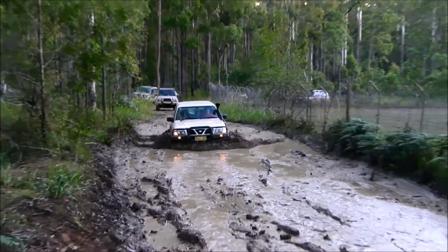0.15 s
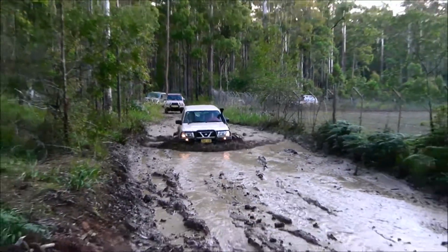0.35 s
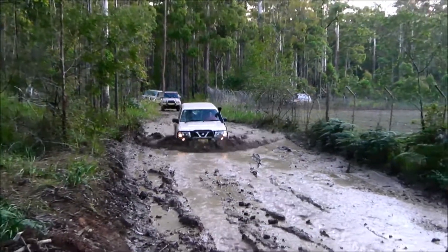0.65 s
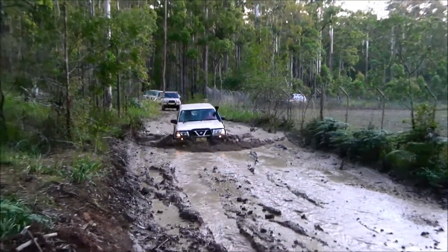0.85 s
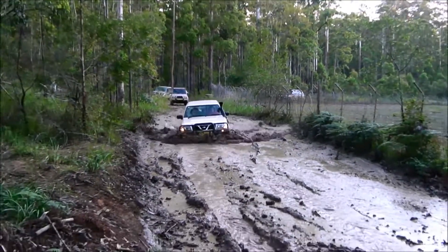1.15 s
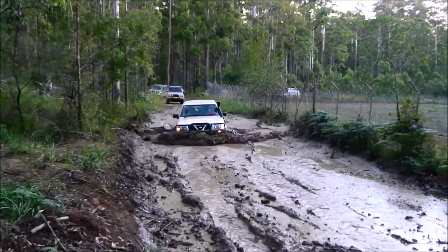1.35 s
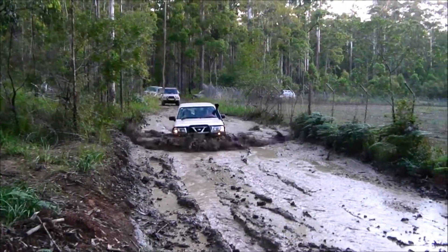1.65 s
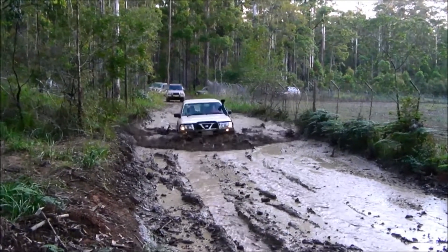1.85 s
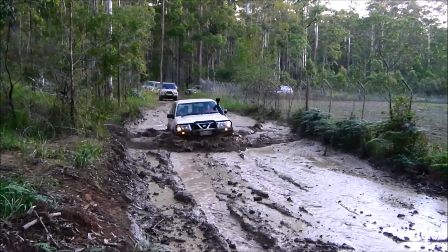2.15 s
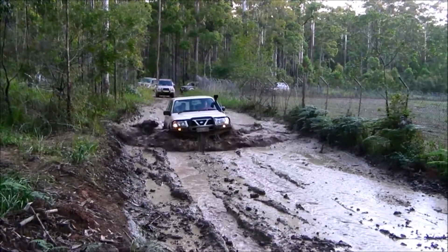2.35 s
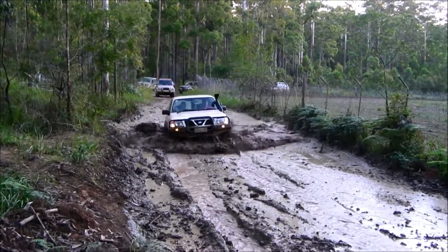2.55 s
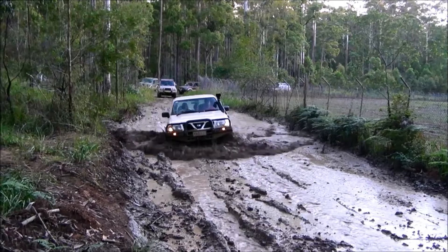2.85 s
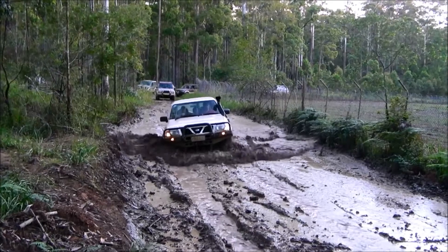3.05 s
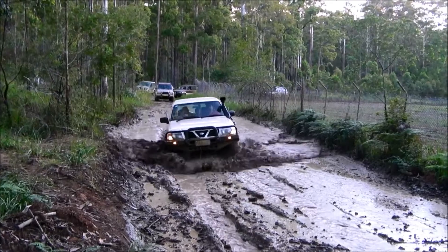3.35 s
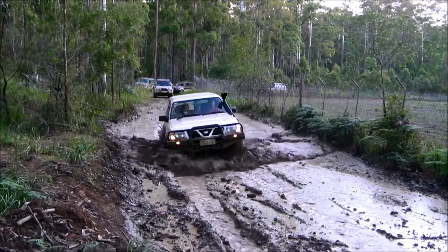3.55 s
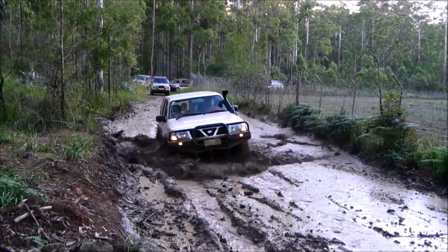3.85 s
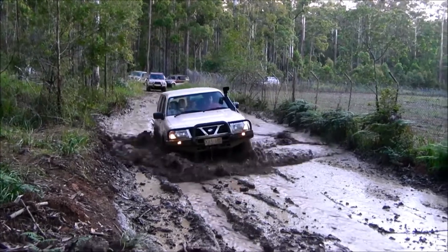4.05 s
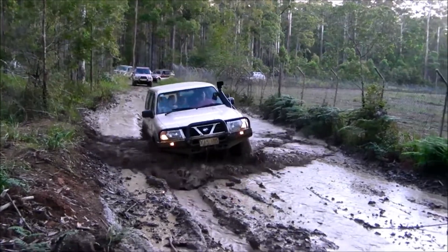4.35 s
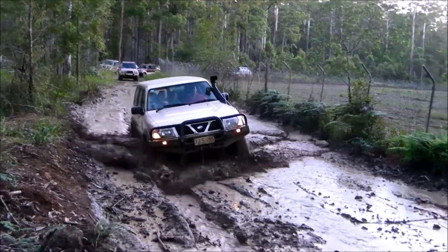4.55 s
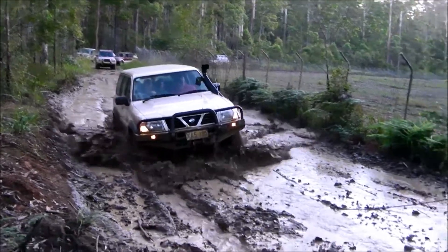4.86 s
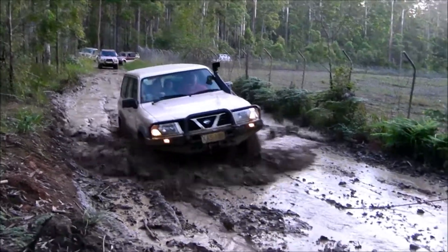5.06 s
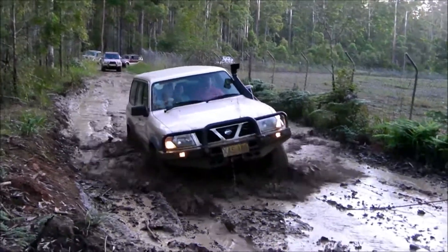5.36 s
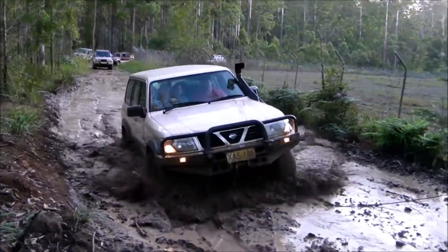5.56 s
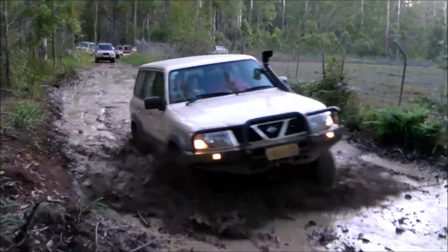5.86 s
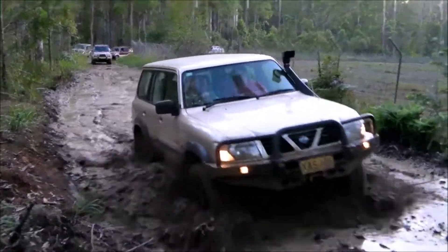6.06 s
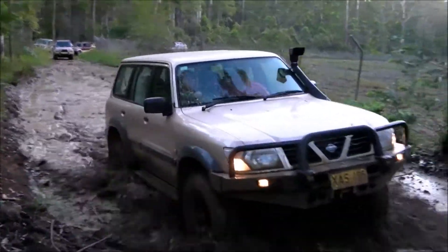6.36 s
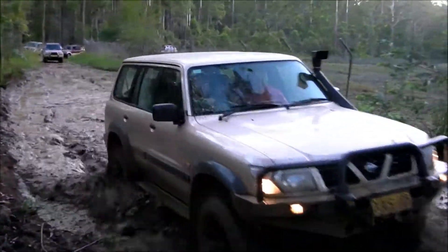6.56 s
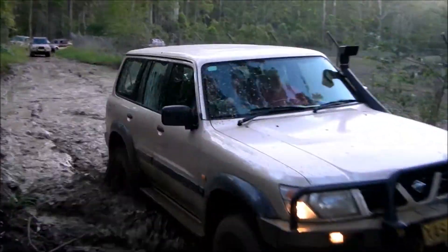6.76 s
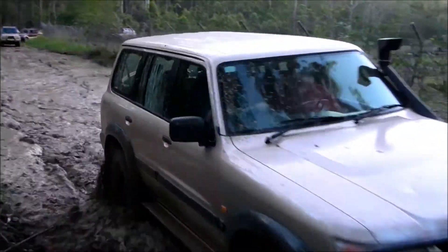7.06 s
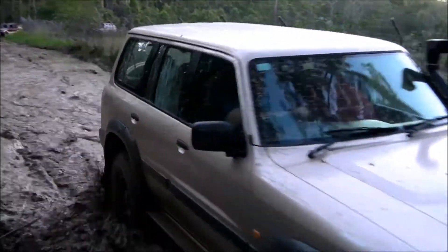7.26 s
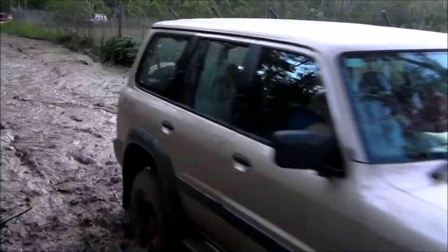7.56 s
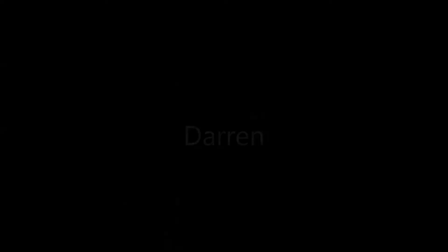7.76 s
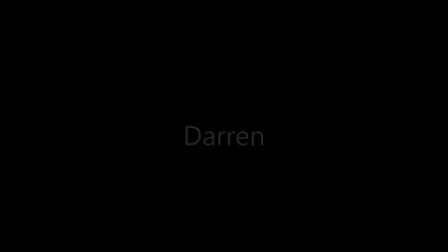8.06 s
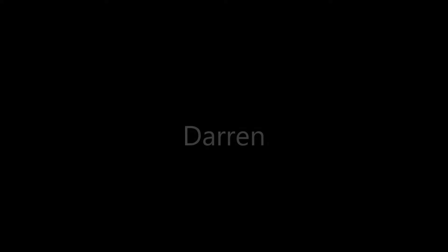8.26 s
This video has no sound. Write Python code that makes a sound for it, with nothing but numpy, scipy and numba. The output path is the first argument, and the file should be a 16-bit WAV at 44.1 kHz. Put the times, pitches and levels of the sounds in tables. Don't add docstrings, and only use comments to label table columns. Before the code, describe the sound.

Steady engine drone under thick sloshing mud and hissing spray, the car coming close with bubbling gulps before abrupt silence.

```python
import sys
import numpy as np
from scipy import signal
from scipy.fft import rfft, irfft, next_fast_len
from scipy.io import wavfile
from scipy.ndimage import uniform_filter1d, map_coordinates
from numba import njit

SR = 44100
rng = np.random.default_rng(int(sys.argv[2]) if len(sys.argv) > 2 else 0)


def bounce(signal):
    frames = np.transpose(np.atleast_2d(signal))
    limited = np.clip(frames, -1, 1)
    pcm = np.round(limited * 32767).astype(np.int16)
    wavfile.write(sys.argv[1], SR, pcm)


def voltage_ratio(decibels):
    exponent = np.asarray(decibels, float) / 20
    return 10 ** exponent


N = 370440


def curves(table):
    s, *columns = np.transpose(table)
    return [np.interp(np.arange(N) / SR, s, column) for column in columns]


def law(near, far_value, near_value, bend=1):
    return far_value + (near_value - far_value) * np.clip(near, 0, 1) ** bend


def unit(x):
    return x / np.sqrt(np.mean(x ** 2))


def walk(rate):
    hold = int(SR / rate)
    levels = np.repeat(rng.standard_normal(N // hold + 1), hold)
    return uniform_filter1d(levels, hold)[:N]


def colour(x, points):
    size = next_fast_len(N)
    hz, db = np.transpose(points)
    f = np.arange(size // 2 + 1) * SR / size + 1
    gain = voltage_ratio(np.interp(np.log(f), np.log(hz), db))
    return irfft(rfft(x, size) * gain, size)[:N]


def late(x, lag_ms):
    return map_coordinates(x, [np.arange(N) - lag_ms * SR / 1000], order=3)


def mirrored(x, *paths):
    copies = sum(share * late(x, ms) for ms, share in paths)
    return (x + copies) / np.sqrt(1 + sum(share ** 2 for _, share in paths))


@njit
def ring(start, hz, cycles, size, glide, n):
    out = np.zeros(n)
    for k in range(len(start)):
        length = int(3 * cycles * SR / hz[k])
        z, w = size[k] + 0j, 2 * np.pi * hz[k] / SR
        turn, rise = np.exp(1j * w - 3 / length), np.exp(1j * w * glide / length)
        for i in range(start[k], min(start[k] + length, n)):
            z, turn = z * turn, turn * rise
            out[i] += z.imag
    return out


def splash(points, count, cycles, scatter_db, grain_db, flicker_db, rate):
    place, pitch, chance = rng.random((count, 3)).T
    start = (place * N).astype(np.int64)
    low, high = points[1][0], points[-2][0]
    size = voltage_ratio(-scatter_db * np.log(1 - chance))
    pockets = ring(start, low * (high / low) ** pitch, 1. * cycles, size, .25, N)
    rush = unit(colour(rng.standard_normal(N), points))
    grains = unit(colour(pockets, [(hz, db + 3 * np.log2(hz)) for hz, db in points]))
    return unit(rush * voltage_ratio(flicker_db * walk(rate)) + voltage_ratio(grain_db) * grains)


def hum(hz, orders, wobble, uneven_db):
    turn = 2 * np.pi * np.cumsum(hz * (1 + wobble * walk(12))) / SR
    total = 0
    for multiple, db in orders:
        level = np.sqrt(2) * voltage_ratio(db + uneven_db * walk(9))
        total = total + level * np.sin(multiple * turn + 2 * np.pi * rng.random())
    return total


# start_s, nearness [0-1], open_water_ahead [0-1], wheel_push_db
APPROACH = [(0, 0, .85, -1.5), (.5, 0.09, 0.8, -.5), (.9, 0.03, .82, -1.5), (1.4, 0.12, .82, .5),
            (1.9, .13, .85, 0), (2.4, 0.12, 0.77, 0.2), (2.9, 0.17, 0.9, 0), (3.5, 0.23, 0.88, .5),
            (4, 0.24, 1, 0), (4.5, 0.35, 0.87, 0.6), (5, 0.35, 0.83, 0.3), (5.6, .49, 0.8, 0.65),
            (6.1, 0.56, 0.77, 0.5), (6.5, 0.65, 0.57, 1), (6.9, 0.71, 0.47, -0.2), (7.25, 0.82, 0.45, -0.5),
            (7.6, 1, .28, 0.5)]


def approach():
    return curves(APPROACH)


WADE_DB = {"churn": (-16.5, -29, 1.5), "fan": (-19, -26, 5), "spray": (-23.5, -22, 0.8),
           "mist": (-5.7, -0.66, 1)}


def wade_db(layer):
    close, _, push_db = approach()
    return law(close, *WADE_DB[layer]) + push_db + 0.62 * walk(5.5)


MIRROR = {"low": (.78, 0.), "spray": (1, 0.36)}


def mirror_share(layer):
    gain, froth = MIRROR[layer]
    return np.clip(gain * (approach()[1] - froth), 0, 1)


# pitch_hz, level_db
CHURN = [(20, -23.5), (45, -26), (80, -11), (140, -8.5), (250, -2), (400, -0.5), (520, 0), (650, -7.5),
         (900, -9.5), (1500, -33)]
FAN = [(400, -23.5), (650, -3.5), (900, 2), (1250, -2.5), (1600, -3.5), (1850, -10.5), (2150, -19.5),
       (2600, -47)]
# far_ms, near_ms
LOW_LAG_MS = (0.8, 0.6)


def churn_and_fan():
    close = approach()[0]
    churn_db, fan_db = wade_db("churn"), wade_db("fan")
    churn = splash(CHURN, count=2500, cycles=4, scatter_db=1.5, grain_db=-7, flicker_db=1.0, rate=25)
    fan = splash(FAN, count=4000, cycles=6, scatter_db=2.5, grain_db=-7, flicker_db=1.0, rate=45)
    low = voltage_ratio(churn_db + 2.5) * churn + voltage_ratio(fan_db + 0.85) * fan
    return mirrored(low, (law(close, *LOW_LAG_MS), mirror_share("low")))


# pitch_hz, level_db
SPRAY = [(1200, -21), (1900, -4.5), (2500, 1), (3600, 1), (4700, 1.5), (5600, -3.5), (7000, -26),
         (9000, -30)]
MIST = [(4000, -11), (6000, 0), (7500, -0.5), (9500, 0), (11000, -5), (13000, -5.5), (15000, -11),
        (17000, -7)]
# pitch_hz, level_db
AIR = [(7000, -34.5), (10000, -2), (12000, 4), (15000, 1)]
# far_ms, near_ms
SPRAY_LAG_MS = (.866, .7)
MIST_MIRROR = (.45, .03, .6)
INVERTED_SHARE = (-.11, -.06)


def spray_and_mist(mist_db, mist_near):
    close = approach()[0]
    lag_ms = law(close, *SPRAY_LAG_MS)
    inverted = 0.389 * lag_ms, law(close, *INVERTED_SHARE)
    spray = splash(SPRAY, count=12000, cycles=5, scatter_db=1.0, grain_db=-3.5, flicker_db=1.04, rate=40)
    mist = splash(MIST, count=20000, cycles=5.2, scatter_db=2.5, grain_db=-14, flicker_db=0.5, rate=17)
    mist = mist + voltage_ratio(2.5 * mist_db - 5.0) * colour(mist, AIR)
    spray = mirrored(voltage_ratio(0.5) * spray, (lag_ms, mirror_share("spray")), inverted)
    mist = mirrored(voltage_ratio(mist_db + 1.3) * mist, (lag_ms, law(mist_near, *MIST_MIRROR)), inverted)
    return spray + mist


# pitch_hz, level_db
GRILLE = [(900, -41), (1300, -9.5), (1550, -1.5), (1850, -2), (2000, -8), (2400, -32)]


def grille(mist_db):
    hollow = splash(GRILLE, count=1500, cycles=7.2, scatter_db=-2.0, grain_db=-10, flicker_db=0.5, rate=30)
    return voltage_ratio(2.6 * mist_db - 1.0) * hollow


def water():
    mist_near = approach()[0] / 0.77
    mist_db = law(mist_near, *WADE_DB["mist"])
    high = voltage_ratio(wade_db("spray")) * (spray_and_mist(mist_db, mist_near) + grille(mist_db))
    return voltage_ratio(.6 * walk(60)) * (churn_and_fan() + high)


# start_s, pitch_hz, level_db (peak)
GULPS = [
    (6.545, 330, -18),
    (6.655, 800, -16),
    (6.82, 760, -13),
    (6.93, 330, -17),
    (7.01, 1700, -15),
]


def gulps():
    s, hz, db = np.transpose(GULPS)
    notes = ring((s * SR).astype(np.int64), hz, 14., voltage_ratio(db), .45, N)
    return colour(notes, [(200, 0), (2200, 0), (4000, -30)])


# multiple, level_db
DRONE_ORDERS = [(.5, -23.5), (.75, -18), (1, 3.5), (1.248, -10.5), (2, -13.5)]
# far_db, near_db, bend
DRONE_DB = (-22, -46.5, 1.07)
# start_s (middle of the dip), length_s, level_db
STUMBLES = [
    (2.54, .06, -13.5),
    (3.42, .25, -6.5),
    (3.755, .06, -25),
    (5.25, .3, -15),
    (5.71, .1, -6),
    (6.23, .08, -9),
    (6.97, .2, -11),
]


def drone():
    t, close = np.arange(N) / SR, approach()[0]
    dips_db = sum(db * np.clip(1 - np.abs(t - s) * 2 / length, 0, 1) for s, length, db in STUMBLES)
    firing_hz = 115.6 * (1 + .008 * walk(2.5))
    tone = hum(firing_hz, DRONE_ORDERS, wobble=.006, uneven_db=1.0)
    return voltage_ratio(law(close, *DRONE_DB) + dips_db - 2.5) * tone


# start_s, pitch_hz
CRANK = [(1.8, 41), (2.3, 42.7), (2.7, 42.94), (3.05, 44.5), (3.6, 41), (4.6, 42), (4.8, 44.3), (5.5, 43.4),
         (5.9, 48.6), (6.4, 51.3), (6.8, 52.3), (7.5, 47.75)]
# start_s, length_s, second_order_db, third_order_db, fourth_order_db
PULLS = [
    (1.902, 0.39, -45.5, -26, -30),
    (2.62, 0.83, -35.5, -26.5, -27),
    (4.75, 0.59, -31.5, -34, -40),
    (5.8, 0.43, -38, -33, -35),
    (6.303, 0.79, -35, -41.5, -35),
]


def labouring_engine():
    t = np.arange(N) / SR
    coast_db, attack_s, release_s = -49, .15, .2
    db = np.full((3, N), 1. * coast_db)
    for s, length, *top_db in PULLS:
        corners = s + np.array([-attack_s, 0, length, length + release_s])
        effort = np.interp(t, corners, [0, 1, 1, 0])
        db = np.maximum(db, coast_db + np.outer(np.array(top_db) - coast_db, effort))
    orders = zip(range(1, 5), (db[0] - 7.5, *db))
    fade_in = np.clip(5 * (t - CRANK[0][0]), 0, 1)
    return hum(curves(CRANK)[0], orders, wobble=0.008, uneven_db=2.5) * fade_in


# multiple, level_db
IDLE_ORDERS = [(1, -43), (2, -40), (3, -31)]
# far_db, near_db, bend
IDLE_DB = (1.5, -12.5, 1.7)


def idle():
    tone = hum(35.86, IDLE_ORDERS, wobble=0.0046, uneven_db=-2.0)
    return voltage_ratio(law(approach()[0], *IDLE_DB)) * tone


def whine():
    hz = 15695 + 15 * walk(30)
    return voltage_ratio(-60 + 6 * walk(14)) * np.sin(2 * np.pi * np.cumsum(hz) / SR)


# pitch_hz, level_db
APART = [(60, -31), (110, -35.5), (200, -36.5), (380, -35.5), (700, -26), (1290, -26.5), (2380, -12.5),
         (4400, -11), (8120, -5.5), (15000, -1)]
# pitch_hz, level_db
LEAN = [(200, -62.5), (2000, -37.5), (8000, -32), (14000, -17.5)]


def scene():
    mid = water() + drone() + labouring_engine() + idle() + gulps()
    side = colour(water(), APART)
    lean = colour(mid, LEAN)
    return np.array([mid + side + lean, mid - side - lean])


def top_cut(x):
    return signal.sosfilt(signal.butter(12, 15710, fs=SR, output="sos"), x)


def record(dry):
    ceiling, top_hz, cut_s = 1.15, 15400, 7.6274
    soft = dry / (1 + (np.abs(dry) / ceiling) ** 4) ** (1 / 4)
    lowpass = signal.ellip(10, .5, 60, top_hz, fs=SR, output="sos")
    heard = signal.sosfilt(lowpass, soft) + whine()
    mix = heard * (np.arange(N) < cut_s * SR)
    return top_cut(mix)


dry = scene()
out = record(dry)
bounce(out)
```